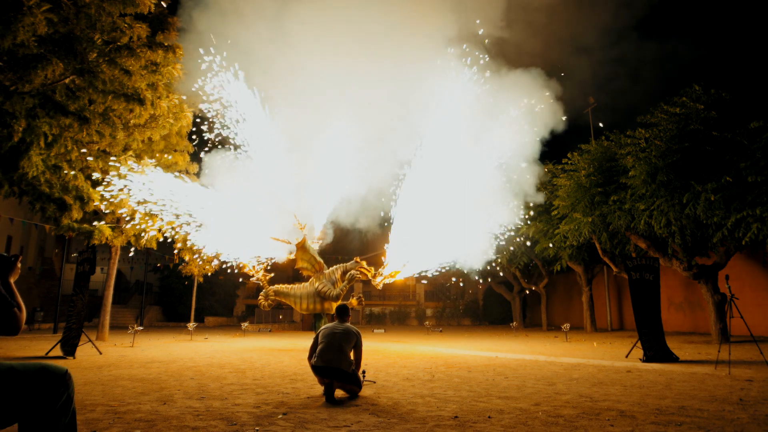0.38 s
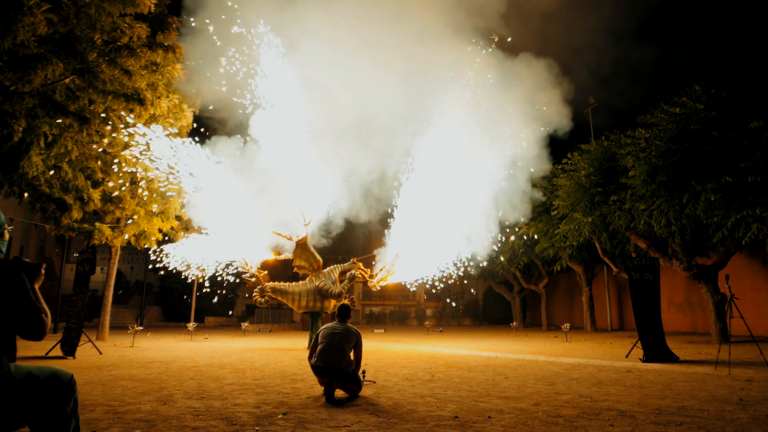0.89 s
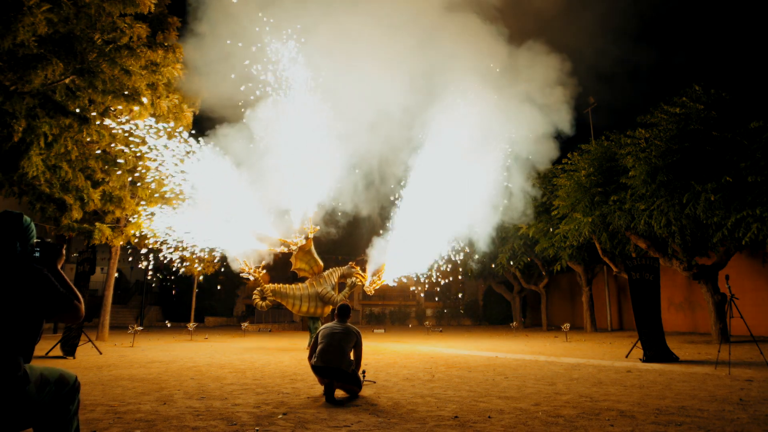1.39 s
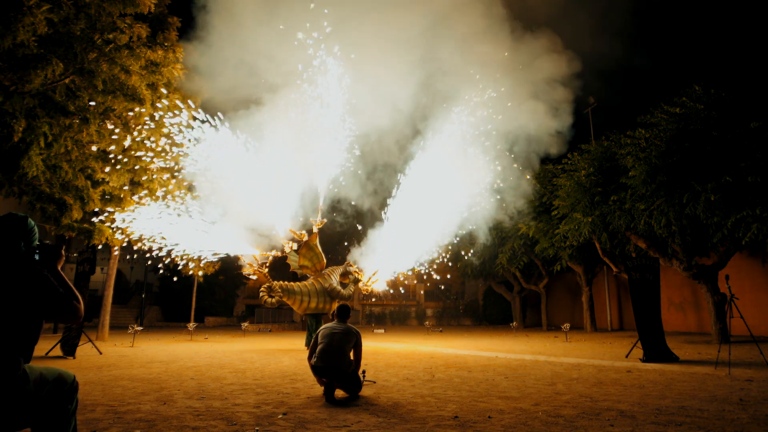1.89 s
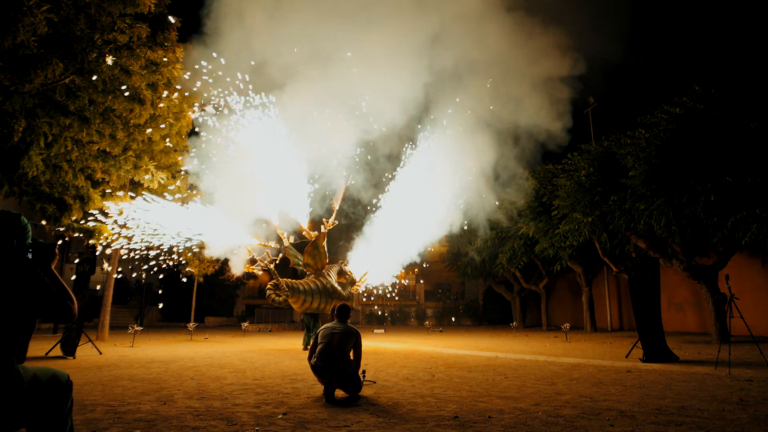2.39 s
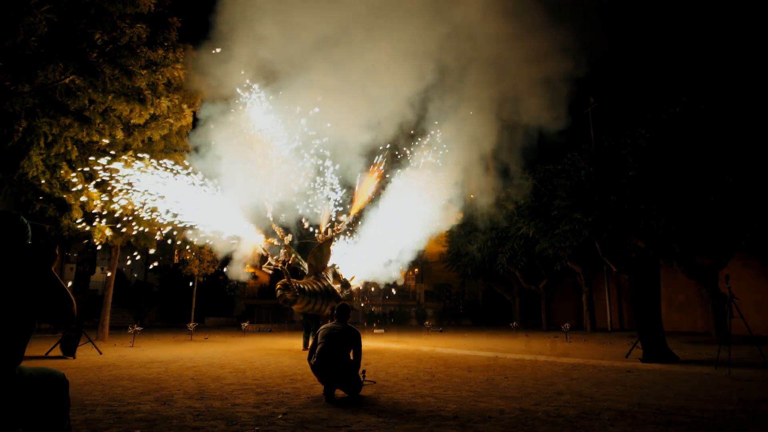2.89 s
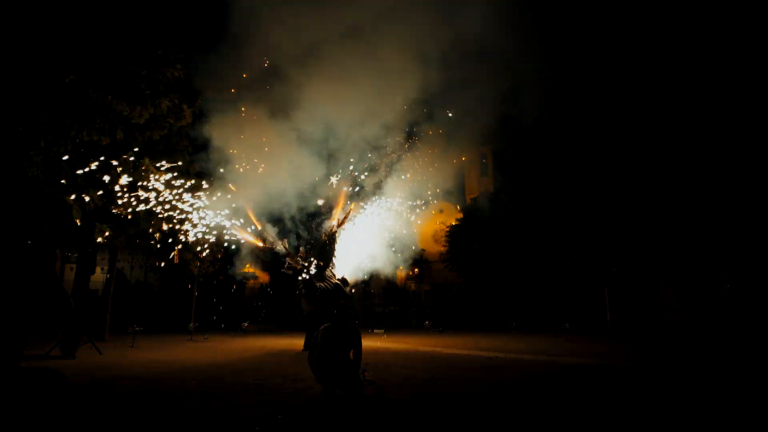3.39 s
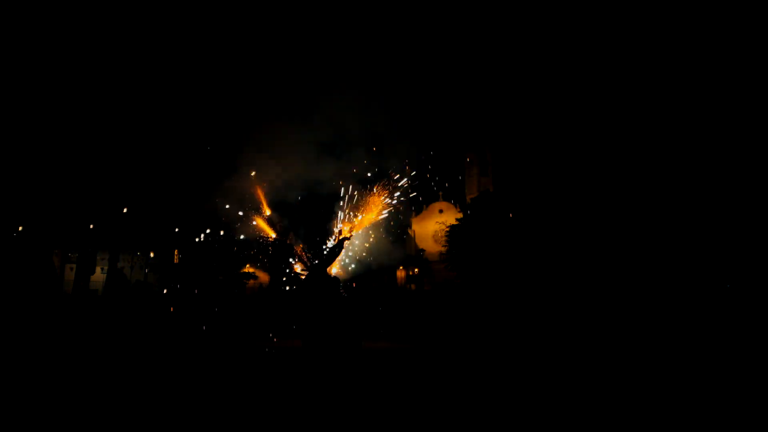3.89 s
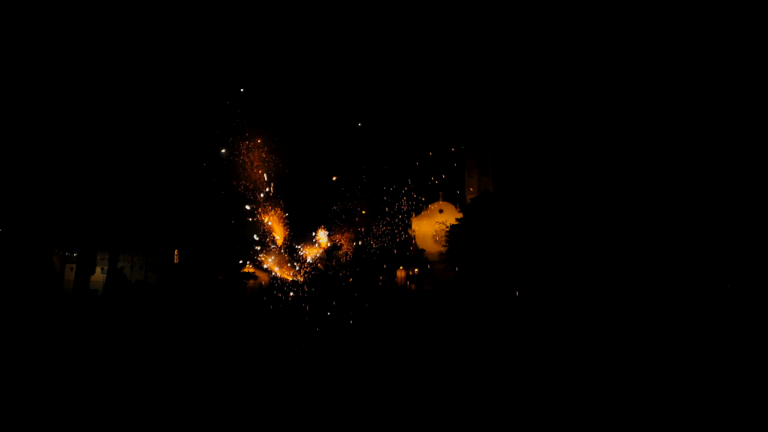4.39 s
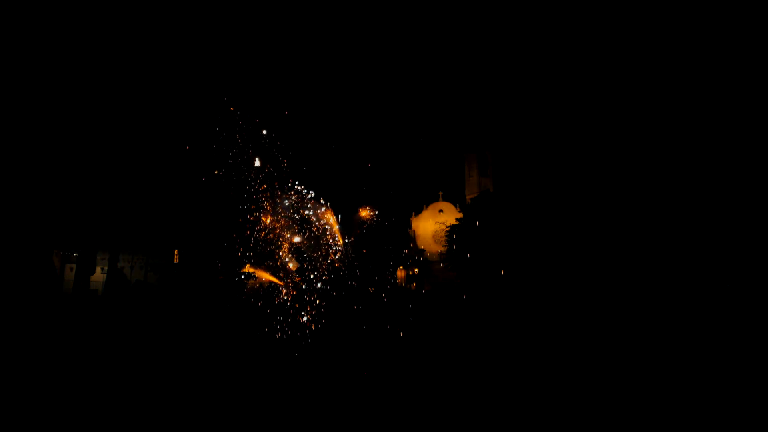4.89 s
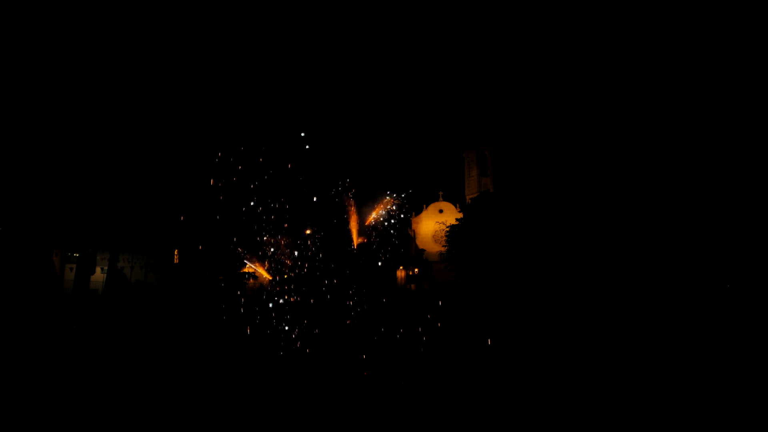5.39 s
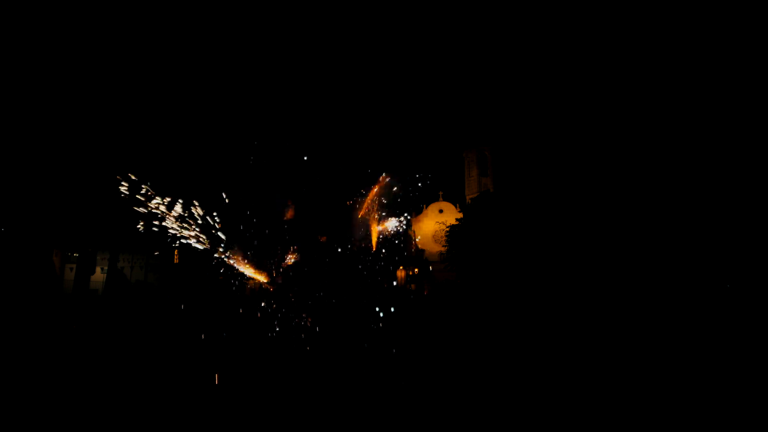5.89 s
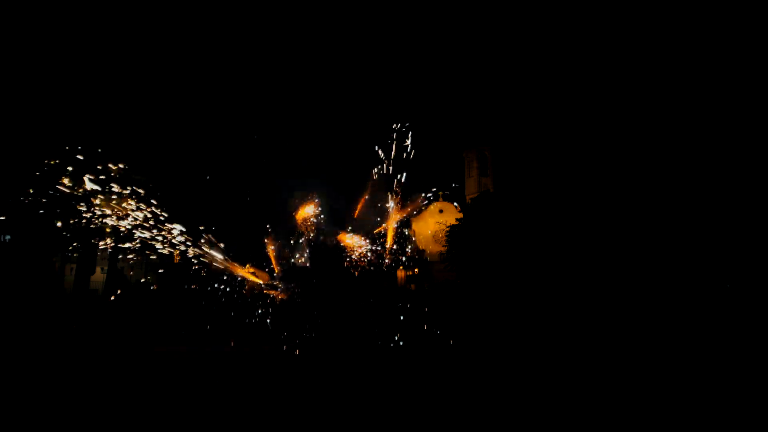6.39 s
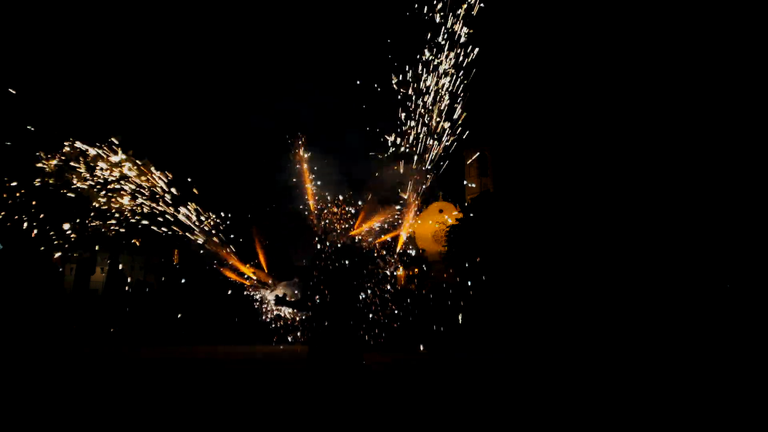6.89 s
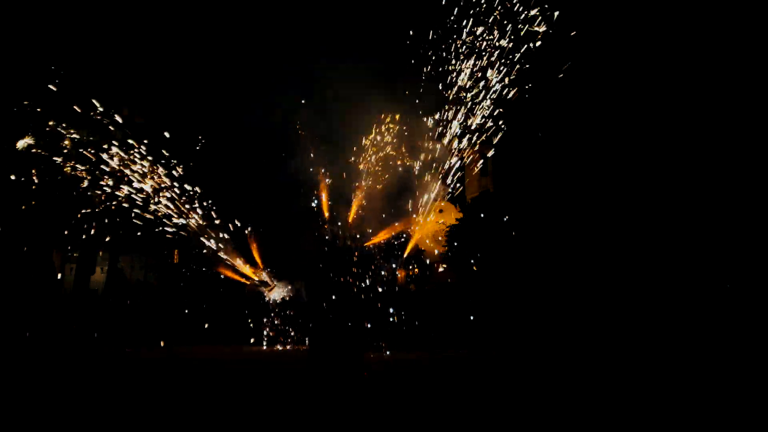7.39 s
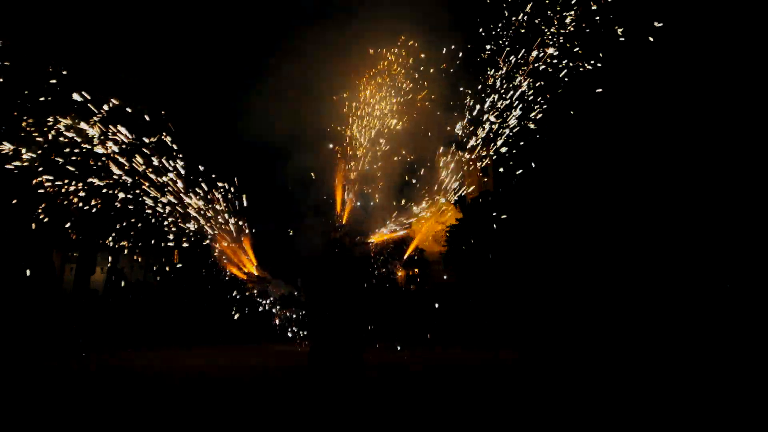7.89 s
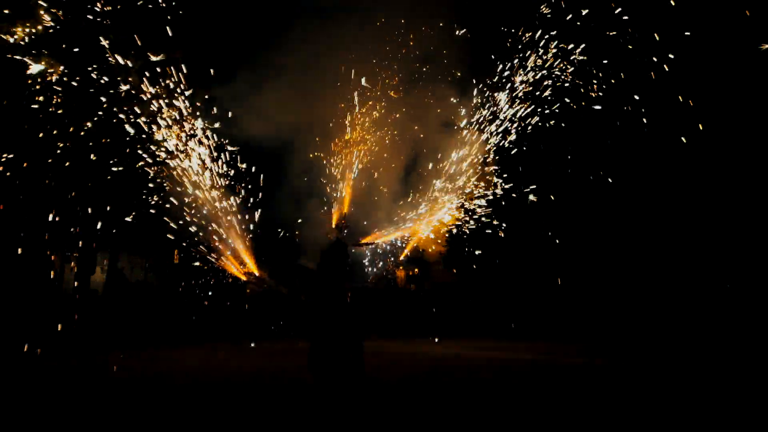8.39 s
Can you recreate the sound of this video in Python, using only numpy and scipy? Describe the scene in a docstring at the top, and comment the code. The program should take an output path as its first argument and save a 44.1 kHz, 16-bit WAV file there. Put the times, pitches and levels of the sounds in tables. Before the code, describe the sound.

Gunpowder fountains roar and hiss outdoors at night, sputter out with sharp cracks echoing off walls, then whoosh back up to a bright full-strength hiss.

```python
"""Gunpowder fountains on a swaying figure burn in an open square at night, heard by one microphone some metres away.
From the start, shaped noise makes the roaring, hissing jets, with ground echoes, over low flames, a hum and the night.
From 1.6 s end charges pop, slap back from the walls and snap (ringing shocks), and puffs of noise spurt near 3-5 s.
The first set burns out by about 4 s, flare-ups follow, and the next set whooshes up to full burn by 6 s.
Near 7.7 s a thin whistle, a wavering sine, passes through the burn."""
import sys
import numpy as np
from scipy import signal
from scipy.fft import rfft, irfft
from scipy.io import wavfile
from scipy.ndimage import uniform_filter1d

SR = 44100
rng = np.random.default_rng(int(sys.argv[2]) if len(sys.argv) > 2 else 0)


def volts_from_decibels(level):
    """Turn decibel levels (scalar or array-like) into linear amplitude factors."""
    exponent = np.asarray(level, float) / 20
    return 10 ** exponent


def materialize(psi):
    """Save the field psi as 16-bit PCM at rate SR to the path in sys.argv[1].

    A 1-D psi becomes a single channel; in a 2-D psi each row is a channel.
    """
    bounded = np.clip(np.atleast_2d(psi).T, -1, 1)
    quanta = np.round(bounded * 32767).astype(np.int16)
    wavfile.write(sys.argv[1], SR, quanta)


N = 376173  # length in samples, about 8.5 s


def evened(x):
    """Scales to rms 1."""
    return x / np.sqrt(np.mean(x ** 2) + 1e-20)


def read(points, hz):
    """Reads a spectrum on a log-frequency axis."""
    f, value = np.transpose(points)
    return np.interp(np.log(hz + 1), np.log(f + 1), value)


def add(mix, s, sound):
    """Mixes a sound in at s seconds."""
    part = mix[round(s * SR):][:len(sound)]
    part += sound[:len(part)]


def band(x, lo_hz, hi_hz):
    """Gentle band-pass."""
    return signal.sosfilt(signal.butter(2, [lo_hz, hi_hz], "band", fs=SR, output="sos"), x)


def coloured_noise(spectrum):
    """Steady noise of rms 1, shaped by a spectrum in dB per Hz."""
    colour = volts_from_decibels(read(spectrum, np.fft.rfftfreq(N, 1 / SR)))
    return evened(irfft(rfft(rng.standard_normal(N)) * colour, N))


# The steady burn of all jets together.
# Each row: time in seconds, level in dB, jet speed (0 is slow, 1 is fast).
BURN = [(0, -24.5, 0.096), (.6, -25, .1), (1.3, -24.5, 0.083), (1.9, -27.5, -0.014), (2.2, -26, 0.032),
        (2.65, -28, .1), (2.8, -32, -0.22), (2.93, -31.5, 0.12), (3.02, -36.5, -0.2), (3.1, -34.5, -0.35),
        (3.55, -38, -.05), (3.75, -40, 0.16), (4.15, -46, -0.061), (4.55, -43, .4), (4.8, -48, .2),
        (5.05, -44.5, 0.2), (5.3, -40.5, 0.08), (5.45, -41.5, 0.27), (5.6, -39, .35), (5.75, -32.5, 0.57),
        (6.0, -24, 0.86), (6.4, -27, 0.78), (6.8, -23.5, 0.78), (7.15, -23, .55), (7.4, -24.5, .7),
        (7.75, -23.5, 0.6), (8.3, -25.5, 0.34), (8.53, -23.5, 0.29)]
# Short flare-ups between the two sets.
# Each row: time of the top in seconds, level there in dB, then rise and fall in ms per 10 dB.
FLARES = [(3.84, -34.5, 70, 160), (3.97, -31.5, 40, 90), (4.3, -30.5, 60, 230), (4.5, -32, 150, 110),
          (5.06, -26.5, 212, 113)]


def burn_db(t):
    """Level of the steady burn plus the flare-ups, added as powers."""
    s, db, _ = np.transpose(BURN)
    power = volts_from_decibels(np.interp(t, s, db)) ** 2
    for top, flare_db, rise_ms, fall_ms in FLARES:
        ms_per_10_db = np.where(t < top, rise_ms, fall_ms)
        power += volts_from_decibels(flare_db - 10 * abs(t - top) * 1000 / ms_per_10_db) ** 2
    return 10 * np.log10(power)


# Spells in which one fountain stands out, its echo drifting and swinging as the figure sways.
# Each row: start and end in seconds, ground echo in ms, drift in ms per second, swing in ms,
# time in seconds at the longest end of a swing, echo share in mid-spell (0 to 1).
SPELLS = [(0, 1.6, 1.5, 0, .07, .9, .32), (0, 2.3, 1.215, .05, .05, .9, .4), (0, .5, 1.04, 0, .02, 0, .25),
          (1.9, 2.8, 1.06, .15, .03, 2.75, .34), (3.2, 4.0, 1.39, -.04, .04, 3.5, .27),
          (3.05, 3.8, 1.19, 0, .035, 2.75, .2), (4.65, 5.6, 1.23, -.02, .04, 5.1, .38),
          (6.5, 8.0, 1.2, -.1, .02, 6.7, .38), (6.3, 7.5, 1.33, 0, .01, 7.1, .18)]
# The first fountain of the new set.
# Each row: time in seconds, ground echo in ms, echo share (0 to 1).
LEAD = [(4.2, .8, .2), (4.45, .77, .35), (4.7, .73, .35), (5.1, .72, .15), (5.4, .78, .3), (5.75, .79, .75),
        (6.0, .75, .9), (6.25, .725, .9), (6.5, .76, .6), (6.75, .8, .33), (7.2, .84, .28), (7.5, .805, .5),
        (7.75, .835, .55), (8.0, .88, .65), (8.2, .89, .55), (8.53, .87, .45)]
SWAY_S = 1.45  # period of the sway
EDGE_SHARE = .65  # part of the share left at the ends of a spell


def ground_comb(t, hz, blur_hz=40000):
    """Power ripple of direct sound plus ground echo, summed over the fountains; rough ground blurs the treble."""
    s, delay_ms, share = np.transpose(LEAD)
    nozzles = [(np.interp(t, s, delay_ms), np.interp(t, s, share, left=0))]
    for start, end, echo_ms, drift, swing_ms, crest, top in SPELLS:
        u = (t - start) / (end - start)
        arc_ms = echo_ms + drift * (t - start) + swing_ms * np.cos(2 * np.pi * (t - crest) / SWAY_S)
        share = top * (EDGE_SHARE + (1 - EDGE_SHARE) * np.sin(np.pi * u))
        nozzles.append((arc_ms, share * (u >= 0) * (u <= 1)))
    ripple = 0
    for ms, share in nozzles:
        ripple += uniform_filter1d(share, size=40) * np.cos(2 * np.pi * hz[:, None] * ms / 1000)
    return np.maximum(1 + np.exp(-hz / blur_hz)[:, None] * ripple, .05)


def crackling_noise(sparks_per_s=3000, spread_db=1.5):
    """Turbulent noise with one-sided spark clicks that grow as the burn turns throaty."""
    sparks = (rng.random(N) < sparks_per_s / SR) * volts_from_decibels(spread_db * np.minimum(rng.exponential(1, N), 5))
    s, _, roar_db = np.transpose(LOWS)
    t = np.arange(N) / SR
    crackle = volts_from_decibels(1.1 * (np.interp(t, s, roar_db) - burn_db(t)) + 10)
    noise = rng.standard_normal(N) - crackle * evened(sparks - sparks.mean())
    return noise / np.sqrt(1 + crackle ** 2)


# Slow smoky jets. Each row: frequency in Hz, level in dB per Hz.
SLOW_JET = [(300, -32), (700, -16.5), (1000, -2.5), (1500, -2.5), (2300, 0), (3200, -0.5), (4200, -2),
            (5000, -4.5), (8500, -6.5), (10000, -14.5), (14000, -18), (16000, -26)]
# Fast thin jets. Each row: frequency in Hz, level in dB per Hz.
FAST_JET = [(300, -40), (700, -10.5), (1300, -2), (2500, -1.5), (4000, 0), (5000, 1), (8500, 4),
            (10000, -2.5), (14000, -5), (16000, -14)]
# The first new jet whooshes in one band while it burns alone.
# Each row: time in seconds, centre of the band in Hz, lift in dB.
WHOOSH = [(5.5, 3800, 3), (5.75, 4150, 6.5), (6.0, 3900, 4.5), (6.25, 4070, 2), (6.55, 4000, -1)]


def jet_colour(t, hz):
    """Jet spectrum over time, blended from slow to fast by jet speed, plus the whoosh; rms 1 at each moment."""
    s, _, speed = np.transpose(BURN)
    speed = np.interp(t, s, speed)
    colour_db = read(SLOW_JET, hz)[:, None] * (1 - speed) + read(FAST_JET, hz)[:, None] * speed
    s, whoosh_hz, lift_db = np.transpose(WHOOSH)
    off = (hz[:, None] - np.interp(t, s, whoosh_hz)) / 450
    whoosh_db = np.interp(t, s, lift_db, left=0, right=0) * np.exp(-off ** 2)
    colour = volts_from_decibels(colour_db + whoosh_db)
    return colour / np.sqrt(np.mean(colour ** 2, axis=0))


def smooth_chance(shape, bins, frames):
    """Random ups and downs of rms 1, smoothed over frequency bins and time frames."""
    chance = uniform_filter1d(rng.standard_normal(shape), size=bins, axis=0)
    return evened(uniform_filter1d(chance, size=frames, axis=1))


def jets(patchy_db=0.65, flicker_db=0.38):
    """Roaring, hissing jets: crackling noise given the jets' colour, level and ground echoes."""
    hz, t, z = signal.stft(crackling_noise(), SR, nperseg=512, noverlap=384)
    patches = smooth_chance(z.shape, 8, 20)  # narrow in pitch, slower
    flicker = smooth_chance(z.shape, 120, 8)  # broad in pitch, quicker
    level_db = burn_db(t) + patchy_db * patches + flicker_db * flicker
    z = z * np.sqrt(ground_comb(t, hz)) * jet_colour(t, hz) * volts_from_decibels(level_db)
    return signal.istft(z, SR, nperseg=512, noverlap=384)[1][:N]


# Levels of the low bands. Each row: time in seconds, flame rumble in dB, throaty roar in dB.
LOWS = [(0, -43.5, -42), (1.5, -43, -42.5), (1.75, -43, -38.5), (1.95, -45.5, -42), (2.9, -45, -42),
        (3.0, -44, -42), (3.2, -49, -48), (3.78, -53, -49.5), (3.87, -43, -47), (4.1, -46.5, -51),
        (4.22, -50, -51), (4.35, -43, -42), (4.56, -44.5, -50), (4.8, -48.5, -44), (5.0, -43, -35),
        (5.15, -47.5, -43), (5.4, -55, -52.5), (6.0, -41.5, -41.5), (6.8, -41, -41), (7.15, -37.5, -32.5),
        (7.3, -36, -35.5), (7.4, -41, -44.5), (7.75, -42.5, -44), (8.53, -40.5, -42)]
# Colour of the rumble. Each row: frequency in Hz, level in dB per Hz.
RUMBLE = [(20, -48), (50, -19), (100, -5.5), (190, -0.5), (300, -3), (450, -9.5), (900, -36)]
# Colour of the roar. Each row: frequency in Hz, level in dB per Hz.
ROAR = [(250, -23), (420, -3), (620, 3.5), (850, 0.5), (1050, -19.5), (1400, -0.5), (2300, -12),
        (3500, -37)]


def flames():
    """Low rumble and throaty roar of the burning gas: two coloured noises that rise and fall."""
    t = np.arange(N) / SR
    s, rumble_db, roar_db = np.transpose(LOWS)
    rumble = coloured_noise(RUMBLE) * volts_from_decibels(np.interp(t, s, rumble_db))
    roar = coloured_noise(ROAR) * volts_from_decibels(np.interp(t, s, roar_db))
    return rumble + roar


# A steady low hum. Each row: frequency in Hz, level in dB.
HUM = [(59.2, -68.5)]


def hum():
    """A steady low sine tone."""
    t = np.arange(N) / SR
    return sum(np.sqrt(2) * volts_from_decibels(db) * np.sin(2 * np.pi * hz * t) for hz, db in HUM)


# Colour of the quiet background. Each row: frequency in Hz, level in dB per Hz.
NIGHT = [(18, -45), (30, -20), (49, -1.5), (68, 0), (82, -8), (209, -1), (500, -5.5), (650, -41),
         (1100, -120)]


def night():
    """Steady low background of the open square: coloured noise."""
    return volts_from_decibels(-56) * coloured_noise(NIGHT)


def cycle(u, hz, damping=1.8):
    """A quickly damped ring of about one cycle, starting at u = 0 seconds."""
    rise_and_fall = np.exp(-damping * hz * abs(u)) * (1 - np.exp(-6 * hz * abs(u)))
    return np.sin(2 * np.pi * hz * u) * rise_and_fall * (u >= 0)


def crack(peak_db, ring_hz, ground_ms, edge_db, push_db, push_hz, echo, rattle_db, edge_hz=9500):
    """A shock that rings about a cycle, its ground echo and debris, then the slow suction and rebound of the gas."""
    t = np.arange(4000) / SR

    def shock(u):
        """The ring plus a sharper edge; 2.22 brings a ring's peak to about its stated level."""
        return 2.22 * (volts_from_decibels(peak_db) * cycle(u, ring_hz) + volts_from_decibels(edge_db) * cycle(u, edge_hz))

    debris = band(rng.standard_normal(len(t)), ring_hz / 4, 2 * ring_hz)
    rattle = volts_from_decibels(rattle_db) * debris * np.exp(-t / 0.0018)
    turns = push_hz * t
    push = -np.sin(2 * np.pi * (turns - .2)) * np.exp(-((turns - .6) / .5) ** 2)
    push *= np.minimum(10 * turns, 1)  # starts softly
    return shock(t) + echo * shock(t - ground_ms / 1000) + rattle + volts_from_decibels(push_db) * push


# End charges that pop with a push of gas.
# Each row: time in seconds, shock peak in dB, ring in Hz, push in dB.
POPS = [(1.6485, -3.5, 3650, -13.5), (3.9483, -7.5, 4400, -23.5), (4.2394, -8, 3000, -17.5),
        (4.52, -8.5, 4340, -33), (5.0466, -6.5, 3400, -20.5)]


def pops():
    """End charges: bright shocks with a strong push of gas."""
    out = np.zeros(N)
    for s, db, hz, push_db in POPS:
        add(out, s, crack(db, hz, ground_ms=.75, edge_db=db - 13, push_db=push_db, push_hz=249,
                          echo=0.57, rattle_db=db - 4.5))
    return out


# Duller slaps off a near wall (about 45 ms after a pop) and a far wall (about 110 ms).
# Each row: time in seconds, shock peak in dB, ring in Hz, push in dB.
SLAPS = [(1.6911, -6, 1900, -18.5), (3.9929, -12, 3440, -27), (4.058, -20, 3000, -38),
         (4.2862, -15, 2540, -29), (4.349, -15.5, 2600, -35), (4.572, -22, 2800, -29),
         (5.093, -8.5, 2820, -31), (5.159, -13.5, 4130, -45)]


def slaps():
    """The pops thrown back by the walls: shocks with a weaker edge."""
    out = np.zeros(N)
    for s, db, hz, push_db in SLAPS:
        add(out, s, crack(db, hz, ground_ms=0.546, edge_db=db - 20, push_db=push_db, push_hz=365,
                          echo=0.64, rattle_db=db - 8))
    return out


# Dry snaps, some over a deep thump.
# Each row: time in seconds, shock peak in dB, ring in Hz, ground echo in ms, thump in dB.
SNAPS = [(2.302, -4.5, 4760, 1.6, -44), (2.3217, -13, 2200, 1.06, -55), (2.9502, -5, 2530, 1.4, -31.5),
         (3.9308, -11.5, 5060, 0.69, -55), (3.9314, -7, 2980, 1.33, -35), (4.2586, -14.5, 1900, 1.42, -33),
         (4.5087, -6.5, 3200, 1.2, -48), (5.0665, -16, 4000, .72, -52), (5.1008, -13, 3200, 0.47, -53)]


def snaps():
    """Dry shocks with a sharp edge, a strong ground echo and a slow, deep push as the thump."""
    out = np.zeros(N)
    for s, db, hz, ground_ms, thump_db in SNAPS:
        add(out, s, crack(db, hz, ground_ms, edge_db=db - 7, push_db=thump_db, push_hz=57,
                          echo=0.92, rattle_db=db - 11))
    return out


# How long echoes last in the square. Each row: frequency in Hz, time to fall by 60 dB in seconds.
SQUARE = [(100, 0.56), (1000, 0.24), (4000, 0.91), (12000, 0.34)]


def square(x):
    """Scattered echoes from walls and trees: a decaying noise tail that swells in over some 30 ms."""
    hz, t, z = signal.stft(rng.standard_normal(SR), SR, nperseg=256)
    rise = 1 - np.exp(-(t / 0.027) ** 2)
    decay = volts_from_decibels(-60 * t / read(SQUARE, hz)[:, None])
    tail = signal.istft(z * rise * decay, SR, nperseg=256)[1]
    return signal.fftconvolve(x, tail / np.linalg.norm(tail))[:N]


def spurt(hiss_db, fall_ms, thud_db):
    """A short puff of hiss with a soft thud under it, loudest in the middle of the returned sound."""
    t = np.arange(-2000, 2000) / SR
    hiss, thud = rng.standard_normal((2, len(t)))
    puff = volts_from_decibels(hiss_db) * evened(band(hiss, 1300, 7600)) + volts_from_decibels(thud_db) * evened(band(thud, 54, 600))
    return puff * np.exp(-abs(t) * 1000 / (fall_ms * np.where(t < 0, 0.62, 1)))  # rises faster than it falls


# Spurts as a charge catches or chokes.
# Each row: time of the top in seconds, hiss there in dB, fall time in ms, thud there in dB.
SPURTS = [(2.927, -27.5, 6, -41), (3.018, -30, 11, -40), (3.371, -60.5, 6, -37), (3.828, -33, 11, -37),
          (3.849, -30, 5.6, -31.5), (3.9, -28.5, 10, -44), (4.04, -39, 15, -38), (4.15, -45, 5, -39),
          (4.268, -26.5, 15, -33), (4.522, -19, 12.6, -33.5), (5.055, -38, 17, -38)]


def spurts():
    """All the puffs, each with its top at its stated time."""
    out = np.zeros(N)
    for s, *row in SPURTS:
        add(out, s - 2000 / SR, spurt(*row))
    return out


# A thin passing whistle. Each row: time in seconds, pitch in Hz, level in dB before the end fades.
WHISTLE = [(7.64, 2100, -42), (7.7, 2240, -33), (7.77, 2320, -35), (7.84, 2130, -43), (7.9, 2130, -39),
           (7.96, 2040, -30)]


def whistle():
    """A wavering near-sine, faded at both ends; returns its start in seconds and its sound."""
    s, hz, db = np.transpose(WHISTLE)
    t = np.arange(s[0], s[-1], 1 / SR)
    tone = np.sqrt(2) * np.sin(2 * np.pi * np.cumsum(np.interp(t, s, hz)) / SR)
    return s[0], tone * volts_from_decibels(np.interp(t, s, db)) * signal.windows.tukey(len(t), .2)


def scene():
    """All sources at one microphone, the same in both channels."""
    mix = jets() + flames() + hum() + night()
    bangs = pops() + slaps() + snaps()
    mix += bangs + volts_from_decibels(-10) * square(bangs)
    mix += spurts()
    add(mix, *whistle())
    return np.array([mix, mix])


def band_limit(x):
    """A steep low-pass at the top of the band."""
    return signal.sosfilt(signal.butter(12, 16490, fs=SR, output="sos"), x)


def record(dry):
    """Cuts the treble steeply near 15.8 kHz and returns the finished mix."""
    edge = signal.firwin(1023, 15760, window=("kaiser", 9), fs=SR)
    mix = signal.oaconvolve(dry, edge[None], "same")
    return band_limit(mix)


dry = scene()
out = record(dry)
materialize(out)
```